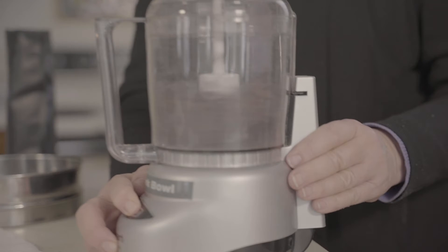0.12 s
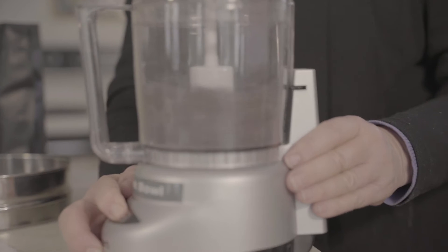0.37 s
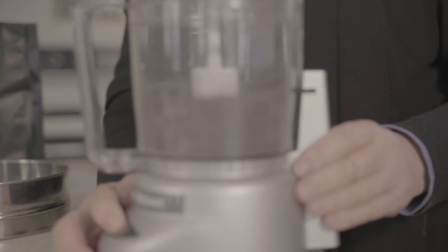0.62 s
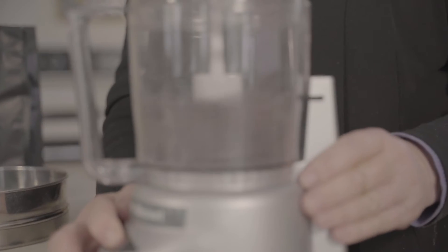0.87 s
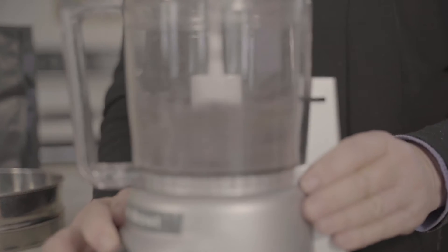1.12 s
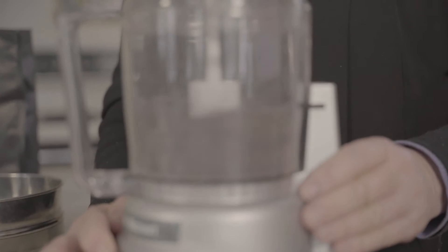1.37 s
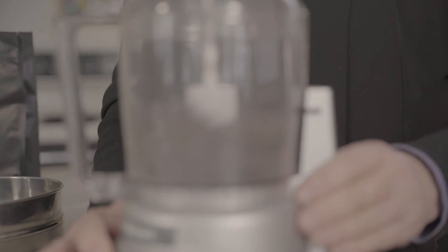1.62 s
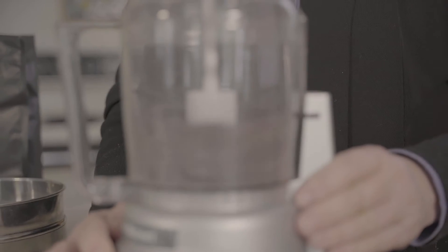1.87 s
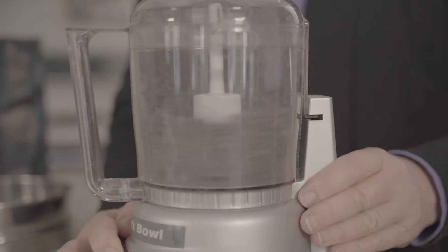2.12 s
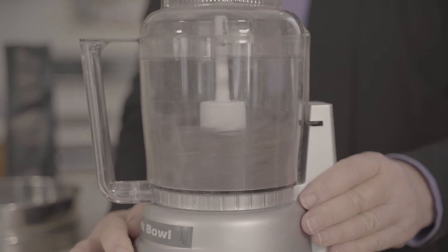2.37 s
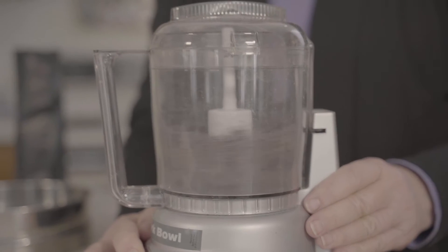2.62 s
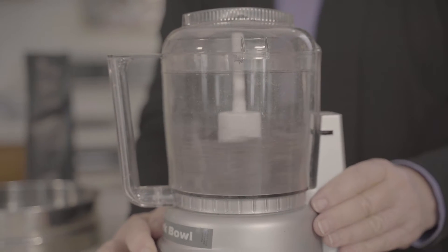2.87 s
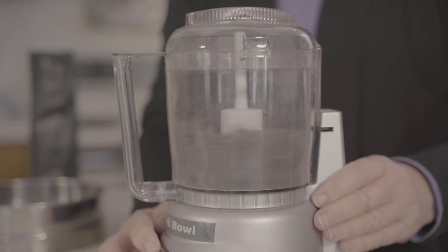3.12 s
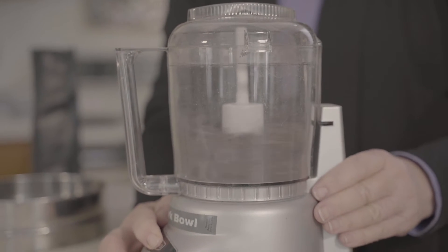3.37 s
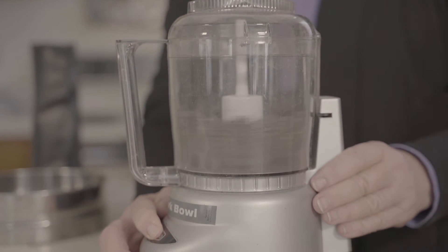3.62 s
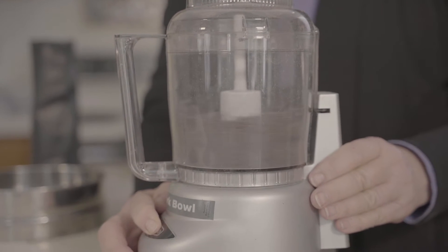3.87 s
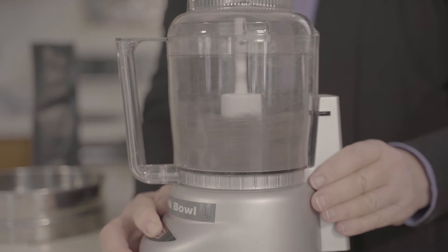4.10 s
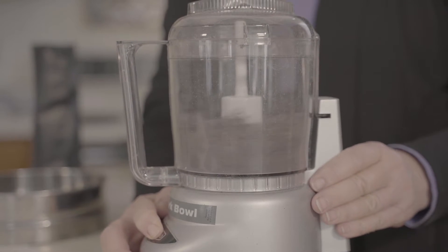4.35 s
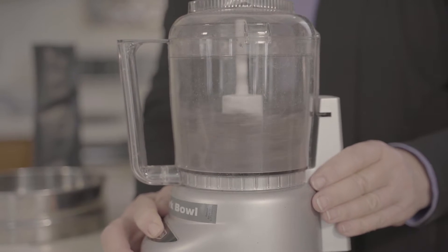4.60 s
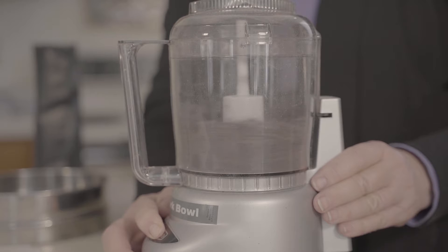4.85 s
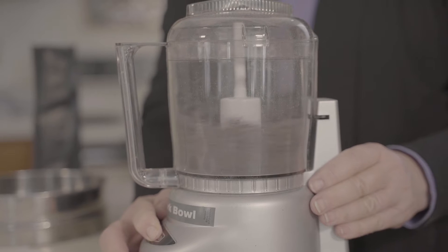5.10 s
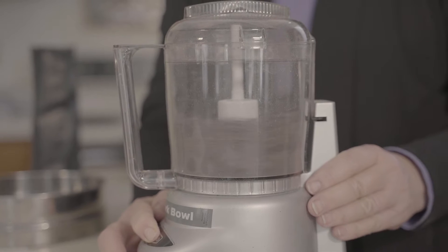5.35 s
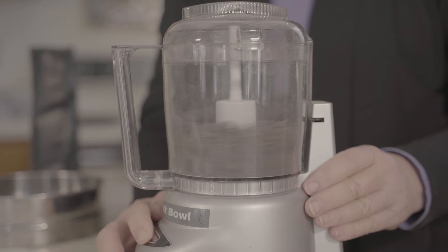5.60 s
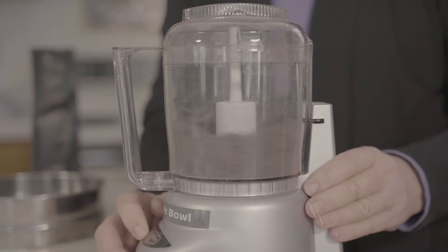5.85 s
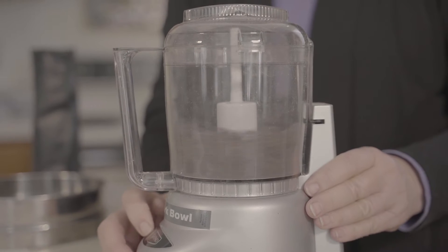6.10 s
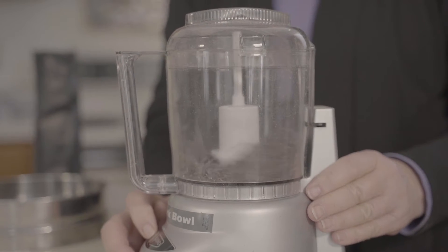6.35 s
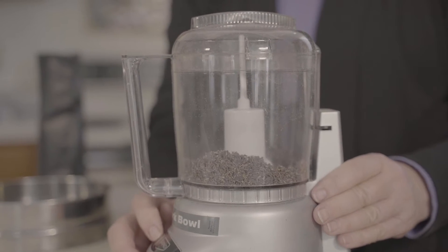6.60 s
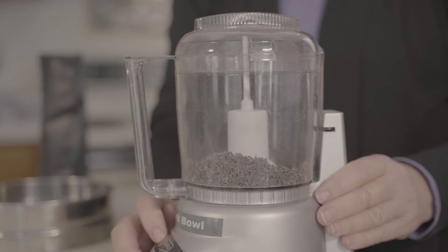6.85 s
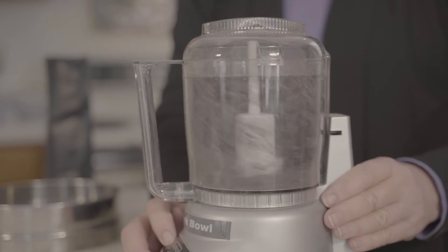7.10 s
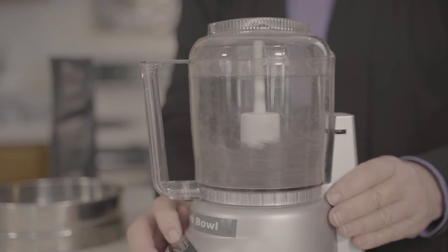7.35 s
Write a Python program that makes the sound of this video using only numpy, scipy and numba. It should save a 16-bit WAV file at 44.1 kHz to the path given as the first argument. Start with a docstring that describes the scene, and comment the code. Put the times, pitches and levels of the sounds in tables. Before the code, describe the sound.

A small electric chopper whines high and steady while dry buds rattle in its plastic bowl, then slows, nearly stops and knocks back into action.

```python
"""A small electric chopper whines and rattles in a kitchen, is let go, slows to a creep and starts again.
The whine comes from gears: a 7-tooth motor pinion drives a 29-tooth blade gear inside a plastic shell.
The rattle is noise for dry buds hitting the bowl, a little denser as the blades pass twice a turn.
Each tone follows the turning blade; noise adds the tooth chatter, the restart knocks and the room air.
A few steady tones hum with the room, and the gears also return as a faint echo from the walls."""
import sys
import numpy as np
from scipy import signal
from scipy.io import wavfile
from scipy.ndimage import uniform_filter1d
from numba import njit

SR = 44100
rng = np.random.default_rng(int(sys.argv[2]) if len(sys.argv) > 2 else 0)


def convert_level_to_amplitude(level_db):
    """Map a level in decibels to its linear amplitude factor."""
    exponent = np.asarray(level_db, float) / 20
    return 10 ** exponent


def transcribe(u):
    """Save the signal u as a 16-bit wav file named by the first command-line argument.

    u: samples, shape (n,) or (channels, n), limited to [-1, 1]; the rate is SR.
    q: integer samples, one column per channel.
    """
    v = np.clip(np.atleast_2d(u).T, -1, 1)
    q = np.round(v * 32767).astype(np.int16)
    wavfile.write(sys.argv[1], SR, q)


N = 329427
T = np.arange(N) / SR  # time of each sample [s]
WHEEL = 29  # teeth on the blade gear
FULL_SPEED = 61  # reference blade speed [turns/s]
RELEASE_S, RESTART_S = 5.575, 6.92  # the switch opens, then closes again [s]
# Broad colour of the plastic shell: (frequency [Hz], relative level per Hz [dB])
SHELL_COLOUR = [(40, -49), (150, -26), (500, -27.5), (700, -17), (1300, -12.5), (2000, -11), (2600, -7.5),
                (3300, 2), (4400, -2), (6300, -6.5), (8800, -6.5), (9800, -11.5), (11700, -15),
                (12800, -10.5), (13800, -15.5), (15000, -20), (15700, -38)]


def read(points, hz):
    """Reads a spectrum table between its points, on a log-frequency axis."""
    f, value = np.transpose(points)
    return np.interp(np.log(hz + 1), np.log(f + 1), value)


def slow(shape, size):
    """Smooth random drift of rms 1 along the last axis, made by averaging noise twice."""
    x = rng.standard_normal(shape)
    x = uniform_filter1d(uniform_filter1d(x, size), size)
    return x / x.std()


def shaped(x, db_of):
    """Colours a sound by a level per Hz that may change with time."""
    hz, t, z = signal.stft(x, SR, nperseg=512)
    gain = convert_level_to_amplitude(db_of(hz[:, None], t)) * np.sqrt(SR / 2)
    return signal.istft(z * gain, SR, nperseg=512)[1][:N]


def modes_db(hz):
    """Lift given by the shell's ringing modes, each a resonance that peaks at its own frequency."""
    # One row a mode: (frequency [Hz], width [Hz], strength [dB])
    ring_modes = [(1850, 150, 0), (3200, 80, 2), (3320, 60, 5), (3480, 45, 9), (3610, 40, 4),
                  (4400, 200, -2)]
    # neighbouring modes have opposite signs
    modes = sum((-1) ** k * convert_level_to_amplitude(db) / (1 + 2j * (hz - f) / width)
                for k, (f, width, db) in enumerate(ring_modes))
    return 20 * np.log10(1 + abs(modes))


def housing_db(hz, ringing=.6):
    """Colour of the shell; blows from outside the gearbox reach its modes only in part."""
    return read(SHELL_COLOUR, hz) + ringing * modes_db(hz)


def slowing_db(order, speed, share=.4):
    """Level change of a gear order below full speed: part of the shell's colour, and weaker tooth blows."""
    # Change at half speed near mesh harmonics 0 to 7: (level [dB])
    half_speed = [-8, -3, -5, -9, -3, -17, 0, -18]
    colour = read(SHELL_COLOUR, order * speed) - read(SHELL_COLOUR, order * FULL_SPEED)
    per_octave = np.take(half_speed, np.round(order / WHEEL).astype(int))
    return share * colour - per_octave * np.log2(speed / FULL_SPEED)


def blade_speed():
    """Blade speed [turns/s]: driven, then braked by drag and friction, then spinning up again."""
    # Speed under power, mostly rising as the buds break up: (time [s], speed [turns/s])
    driven = [(0, 58.43), (.4, 58.77), (.8, 59.39), (1.2, 59.93), (1.5, 60.45), (1.8, 60.74), (2.1, 61.2),
              (2.4, 61.46), (2.6, 61.57), (2.8, 61.51), (3.0, 61.28), (3.6, 61.16), (4.2, 60.99),
              (4.4, 60.77), (5.575, 60.8)]
    drag_s, friction = 1.15, 53  # drag time [s], dry friction as a speed [turns/s]
    spin_to, spin_half_s = 65, .052  # speed headed for [turns/s], time to reach half of it [s]
    creep = .5  # lowest speed [turns/s]
    coast = (driven[-1][1] + friction) * np.exp(-(T - RELEASE_S) / drag_s) - friction
    since = np.maximum(T - RESTART_S, 0)
    spin_up = spin_to * since / (since + spin_half_s)
    free = np.maximum(np.where(T < RESTART_S, coast, spin_up), creep)
    return np.where(T < RELEASE_S, np.interp(T, *np.transpose(driven)), free)


def controls(speed):
    """Levels in dB of rattle, its treble, tooth load and chatter, which follow speed and switch."""
    # Rattle at 2300-2800 Hz before speed and bite change it: (time [s], level [dB])
    rattle_levels = [(0, -54.5), (.6, -54.5), (1.7, -54), (2.1, -55), (2.6, -54), (3.2, -55.5), (4.4, -57),
                     (5.57, -54.5), (5.84, -56.5), (6.0, -56.5), (7.47, -56)]
    # A layer dies away below its knee: (speed [turns/s], steepness)
    rattle_knee = (13.6, 2.3)
    fizz_knee = (30.4, 2.9)
    teeth_knee = (14, 3)
    chatter_knee = (22, 3)
    settle_s = 0.18  # the buds calm no faster than this [s]
    kick = 19  # the first jerk stirs the buds like this speed [turns/s]
    unload_s, seat_s = .1, 0.048  # teeth relax after release; they seat after the restart [s]
    bite_s, bite_fade_s = 6.963, 0.24  # the blade bites into the heap; fade of the bite [s]

    stir = np.exp(np.maximum.accumulate(np.log(speed) + T / settle_s) - T / settle_s)
    again = T > RESTART_S
    coasting = (T > RELEASE_S) & (T <= RESTART_S)
    stir = np.where(again, np.maximum(speed, kick), stir)
    knees = (rattle_knee, fizz_knee, teeth_knee, chatter_knee)
    rattle_drop, fizz_drop, teeth_drop, chatter_drop = (
        -20 * np.log10(1 + (knee / stir) ** steep) for knee, steep in knees)

    # the resting heap is flung up at the bite; just before, all is a little quieter
    bite = (T > bite_s) * np.exp(-np.maximum(T - bite_s, 0) / bite_fade_s)
    waiting = -2 * (again & (T < bite_s))
    buds = np.interp(T, *np.transpose(rattle_levels)) + waiting
    relaxed = coasting * (1 - np.exp(-np.maximum(T - RELEASE_S, 0) / unload_s))
    slack = -14 * again * np.exp(-np.maximum(T - RESTART_S, 0) / seat_s)
    finer = -0.13 * T * (T < RESTART_S)  # the treble dims as the buds get finer

    rattle_db = buds + rattle_drop + 4.5 * bite
    fizz_db = buds + fizz_drop - 2.5 + finer
    load_db = teeth_drop - 6 * relaxed + slack
    # loose teeth chatter more when coasting, and most at the bite
    chatter_db = chatter_drop - 11.5 + 13.5 * relaxed + 21 * bite + waiting
    return rattle_db, fizz_db, load_db, chatter_db


@njit
def sines(turns, orders, phases, gains, hop):
    """Adds sines that turn a fixed number of times per blade turn, with a gain given every hop samples."""
    out = np.zeros(len(turns))
    for k in range(len(orders)):
        for i in range(len(turns)):
            j, u = i // hop, (i % hop) / hop
            gain = gains[k, j] * (1 - u) + gains[k, j + 1] * u
            out[i] += gain * np.sin(2 * np.pi * (orders[k] * turns[i] + phases[k]))
    return out


def gear_tones(speed, turns, load_db, waver_db=2.5):
    """Meshing teeth whine at harmonics with sidebands from wheel run-out, coloured by the shell."""
    # Levels here are those at full speed, before load, drift and resonances change them.
    # One row a mesh harmonic 1 to 7, columns are sidebands -5 to +5 blade turns: (level [dB], ...)
    mesh_levels = [(-74.2, -73.4, -76.5, -67.9, -66.4, -69.4, -52.3, -62.5, -63.9, -64.3, -71.2),
                   (-57.6, -49.9, -55.7, -48.1, -33.8, -44.7, -45.5, -55.3, -58.2, -69.6, -58.3),
                   (-68.4, -68.4, -66.8, -64.0, -56.8, -65.1, -65.1, -60.9, -70.4, -73.6, -70.4),
                   (-81.1, -64.9, -73.0, -62.8, -55.5, -59.9, -67.0, -58.7, -63.3, -70.5, -65.4),
                   (-76.2, -77.2, -69.3, -66.5, -67.2, -70.8, -67.0, -67.1, -71.3, -66.9, -81.1),
                   (-84.0, -79.7, -71.3, -73.3, -79.9, -76.5, -77.7, -75.9, -77.9, -81.5, -86.1),
                   (-83.2, -80.6, -76.4, -88.9, -81.4, -78.1, -76.0, -82.0, -72.7, -76.4, -83.2)]
    # Mesh harmonics 2 to 5, one motor turn below, sidebands -4 to +3 blade turns: (level [dB], ...)
    below_levels = [
        [-66, -63, -62, -49, -53, -59, -63, -57],
        [-71, -76, -71, -66, -81, -70, -72, -70],
        [-76, -75, -73, -72, -75, -73, -77, -73],
        [-78, -77, -73, -75, -82, -76, -71, -74],
    ]
    # The same, one motor turn above: (level [dB], ...)
    above_levels = [
        [-63, -63, -59, -57, -65, -60, -61, -73],
        [-84, -74, -75, -79, -69, -67, -78, -70],
        [-75, -74, -73, -74, -76, -69, -78, -82],
        [-75, -77, -73, -71, -69, -79, -72, -74],
    ]
    # Blade shaft, 1 to 11 times its speed: (level [dB])
    shaft_levels = [-86, -74, -78, -78, -81, -82, -87, -88, -98, -81, -83]
    # Motor turn plus -1 to +2 blade turns: (level [dB])
    rotor_levels = [-83, -81.5, -80.5, -81]
    # Bearing tones: (multiple of the blade speed, level [dB])
    bearing = np.array([(8.91, -83), (9.91, -85), (16.82, -75), (17.82, -80)])
    # Tones that carry the whine at working speed: (multiple of the blade speed, level [dB])
    whine = [(30, -53.8), (52.857, -46), (53.857, -57), (54, -54), (55, -53), (56, -46.6), (57, -39.3),
             (58, -43), (59, -43)]
    # Close peaks and dips of shell and room that these tones drift over: (frequency [Hz], level [dB])
    fine_peaks = [(1752, -10), (1766, -1), (1779, -11), (1795, -10), (1808, -2), (1820, 3), (1830, 0),
                  (1846, 2), (3090, -14), (3170, -11), (3205, -4), (3230, -2), (3250, -3), (3270, 2),
                  (3290, 3), (3318, 7), (3332, 3), (3345, -4), (3360, -3), (3380, -5), (3395, -1),
                  (3405, -4), (3418, 3), (3433, -3), (3447, 2), (3464, 6.5), (3476, 7), (3484, 5),
                  (3496, 7), (3506, -1), (3522, 1), (3555, -2), (3567, -8), (3586, -6), (3612, 2),
                  (3627, -7), (3636, 0)]
    # The whine swells and sinks as a whole: (time [s], level [dB])
    swell_levels = [(0, 0), (.14, 2.5), (.2, -2), (.4, -2), (.5, 2), (.58, 0), (1.05, -1.5), (1.22, 2),
                    (1.28, -2), (1.5, 1.5), (1.9, -0.5), (2.1, 2.5), (2.4, 0), (3.05, 0), (3.1, -1),
                    (3.6, 2), (3.9, -1), (4.1, -0.5), (5.57, 0.5)]
    # Small resonances that single tones pass: (frequency [Hz], width [Hz], lift [dB])
    lifts = [(525, 10, 9), (655, 12, 7), (995, 15, 4), (8800, 400, 2), (10200, 250, 8), (12700, 400, 4)]

    hop = 256  # samples between gain values
    motor = WHEEL / 7  # motor turns per blade turn, by the 7-tooth pinion
    mesh = WHEEL * np.arange(1, len(mesh_levels) + 1)[:, None]
    orders = [mesh + np.arange(-5, 6)]
    orders += [mesh[1:5] - motor + np.arange(-4, 4), mesh[1:5] + motor + np.arange(-4, 4)]
    orders += [np.arange(1, 12), motor + np.arange(-1, 3), bearing[:, 0]]
    orders = np.concatenate([np.ravel(o) for o in orders])
    tables = (mesh_levels, below_levels, above_levels, shaft_levels, rotor_levels, bearing[:, 1])
    db = np.concatenate([np.ravel(table) for table in tables])

    t = np.arange(N // hop + 2) * hop / SR
    k, now = orders[:, None], np.interp(t, T, speed)
    # after the restart, hammering teeth share the strong tones out among their neighbours
    spread = .45 * (uniform_filter1d(db, size=5) - db) * (orders > WHEEL / 2)
    spread = spread + 2 * (orders > 1.5 * WHEEL)
    db = db[:, None] + spread[:, None] * (t > RESTART_S)
    db = db + slowing_db(k, now) + modes_db(k * now) - modes_db(k * FULL_SPEED)
    db = db + np.interp(t, T, load_db) + waver_db * slow(db.shape, size=24)
    # away from working speed [turns/s] the tones break up
    working = (now > 58.3) & (t < RELEASE_S)
    db = db + 2.5 * ~working * slow(db.shape, size=4)
    db = db + sum(lift * np.exp(-((k * now - hz) / width) ** 2) for hz, width, lift in lifts)

    # while working, the main tones take their own levels instead
    swell = np.interp(t[working], *np.transpose(swell_levels))
    for order, level_db in whine:
        chosen = abs(orders - order) < .01
        db[chosen, working] = level_db + read(fine_peaks, order * now[working]) + swell

    # run-out presses the teeth hardest once a turn: the main whine and its two neighbours
    # peak nearly together, scattered by only 0.07 of a cycle
    scatter = np.where(abs(orders - 2 * WHEEL + 1) <= 1, .07, 1)
    phases = scatter * rng.standard_normal(len(orders))
    return sines(turns, orders, phases, np.sqrt(2) * convert_level_to_amplitude(db), hop)


def chatter(speed, turns, width_hz=200):
    """Teeth never meet evenly: a band of noise rides on every mesh harmonic."""
    # Noise around mesh harmonics 1 to 7, before speed and shell change it: (level [dB])
    skirt_levels = [-66, -62, -62, -59, -59, -68, -72]
    out = np.zeros(N)
    for k, db in enumerate(skirt_levels):
        order = WHEEL * (k + 1)
        shake = signal.lfilter(*signal.butter(2, width_hz, fs=SR), rng.standard_normal((2, N)))
        angle = 2 * np.pi * order * turns
        band = (shake[0] * np.cos(angle) + shake[1] * np.sin(angle)) / shake.std()
        out += convert_level_to_amplitude(db + slowing_db(order, speed)) * band
    # undo the per-Hz scaling, so that only the ringing modes colour the noise
    return shaped(out, lambda hz, t: modes_db(hz) + 0 * t) / np.sqrt(SR / 2)


def walls(x, t60=.5):
    """Sparse echoes of random sign off the walls, dying away by 60 dB in t60 seconds."""
    t = np.arange(SR // 2) / SR
    signs = rng.choice([-1., 1.], len(t))
    tail = signs * (rng.random(len(t)) < .05) * convert_level_to_amplitude(-60 * t / t60) * (t > .005)
    return signal.fftconvolve(x, tail / np.linalg.norm(tail))[:N]


def rattle(turns, rattle_db, fizz_db, once=0.067, twice=0.042, crackle_db=0.5, patchy_db=1.0):
    """Buds strike bowl and blades: uneven noise that bunches with each blade pass; slower means duller."""
    ticks = rng.standard_normal(N) * convert_level_to_amplitude(crackle_db * slow(N, size=30))
    ticks *= 1 + once * np.cos(2 * np.pi * turns) + twice * np.cos(4 * np.pi * turns)

    def level_db(hz, t):
        """Blends between two 500 Hz wide bands, around 2550 and 8050 Hz."""
        high = np.clip(np.log((hz + 1) / 2550) / np.log(8050 / 2550), 0, 1.4)
        low_db = np.interp(t, T, rattle_db) - housing_db(2550) - 10 * np.log10(500)
        high_db = np.interp(t, T, fizz_db) - housing_db(8050) - 10 * np.log10(500)
        patches = slow((len(hz), len(t)), size=8)
        return housing_db(hz) + (1 - high) * low_db + high * high_db + patchy_db * patches
    return shaped(ticks / ticks.std(), level_db)


def kitchen():
    """Steady low murmur: coloured noise for the air and pure tones for the appliances."""
    # Colour of the air noise: (frequency [Hz], relative level per Hz [dB])
    air_colour = [(25, -4), (60, -13), (150, 3), (400, -0.5), (1000, -5), (1600, -18.5), (2500, -23),
                  (3300, -21), (4400, -28), (7000, -47.5), (12000, -63.5)]
    # Appliance tones: (frequency [Hz], rms level [dB])
    appliances = [(60, -92), (120, -80), (202, -84), (4010, -99.5)]
    air = shaped(rng.standard_normal(N), lambda hz, t: read(air_colour, hz) + 0 * t)
    tones = sum(np.sqrt(2) * convert_level_to_amplitude(db) * np.sin(2 * np.pi * (hz * T + rng.random()))
                for hz, db in appliances)
    return convert_level_to_amplitude(-74.5) * air / air.std() + tones


def knocks(t60=0.023):
    """Gears take up their slack, then hammer while speeding up: short noise bursts ring the shell."""
    # One row a knock: (time [s], relative level [dB])
    switch_knocks = [(6.919, -39.5), (6.961, -40), (7.116, -22), (7.164, -23.5), (7.182, -20), (7.201, -21),
                     (7.262, -23), (7.28, -28), (7.347, -30), (7.392, -29.5)]
    # each burst rises within 0.6 ms and falls by 60 dB in t60 seconds
    burst = sum(convert_level_to_amplitude(db - 60 * np.clip(T - s, 0, 1) / t60) * np.clip((T - s) / 0.0006, 0, 1)
                for s, db in switch_knocks)
    ring = shaped(rng.standard_normal(N), lambda hz, t: housing_db(hz) + modes_db(hz) + 0 * t)
    return convert_level_to_amplitude(-7.0) * burst * ring / ring.std()


def scene():
    """Adds up the chopper, the echo of its gears and the room."""
    speed = blade_speed()
    rattle_db, fizz_db, load_db, chatter_db = controls(speed)
    speed = speed * (1 + .0003 * slow(N, size=1500))  # lumps under the blade tug at the shaft
    turns = np.cumsum(speed) / SR
    gears = gear_tones(speed, turns, load_db) + chatter(speed, turns) * convert_level_to_amplitude(chatter_db) + knocks()
    echo = convert_level_to_amplitude(-22) * walls(gears)
    mix = gears + echo + rattle(turns, rattle_db, fizz_db) + kitchen()
    return mix[None]


def roll_off(x):
    """The treble ends steeply here."""
    return signal.sosfilt(signal.butter(12, 15700, fs=SR, output="sos"), x)


def record(dry):
    """Turns the finished mix into the sound that is heard."""
    return roll_off(dry)


dry = scene()
out = record(dry)
transcribe(out)
```